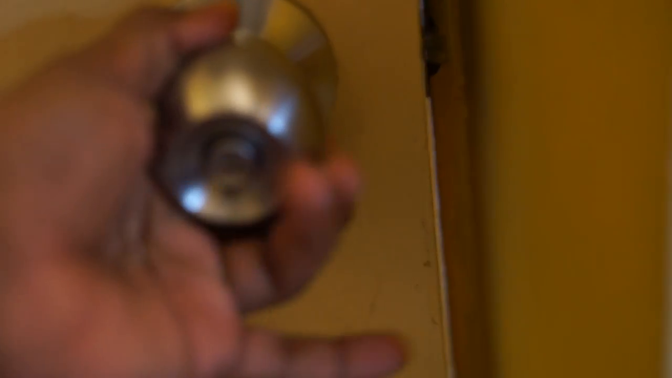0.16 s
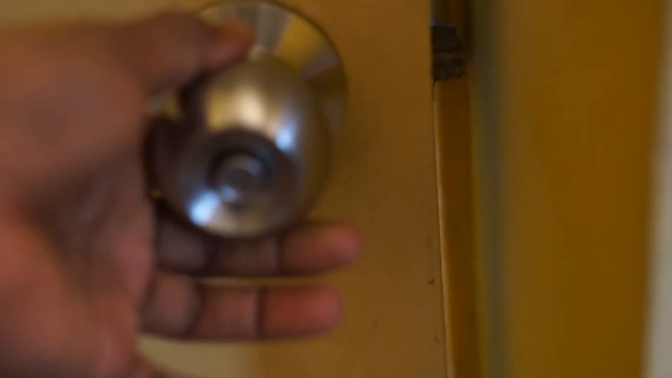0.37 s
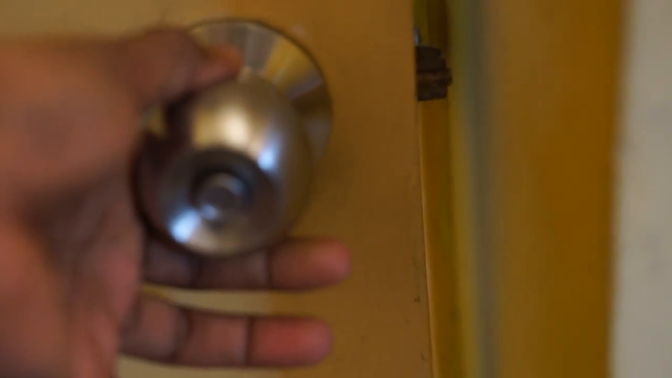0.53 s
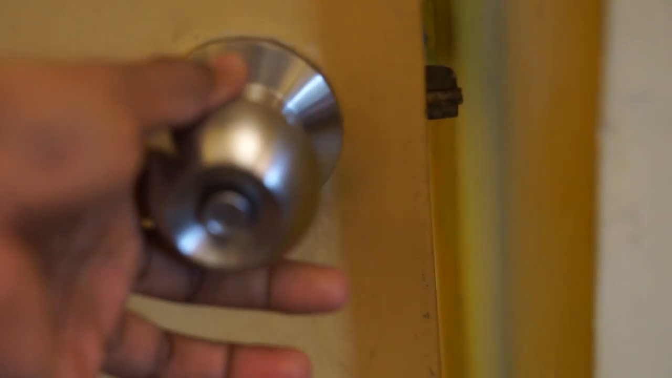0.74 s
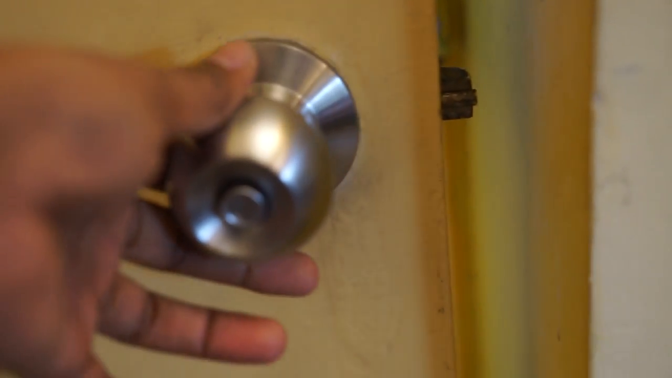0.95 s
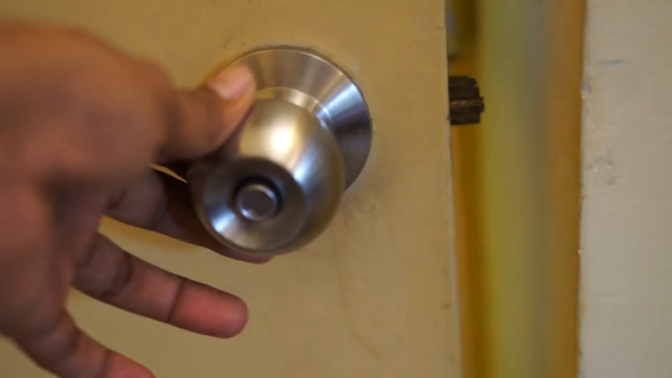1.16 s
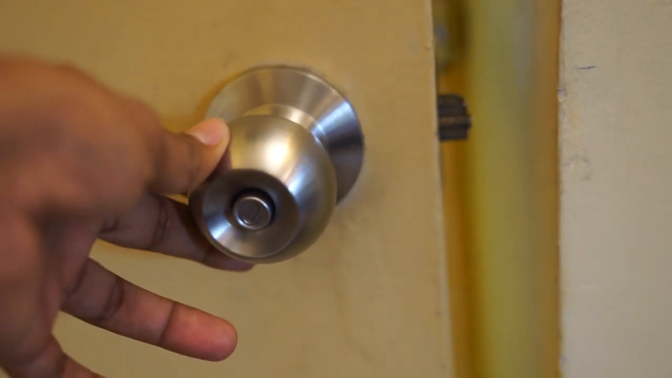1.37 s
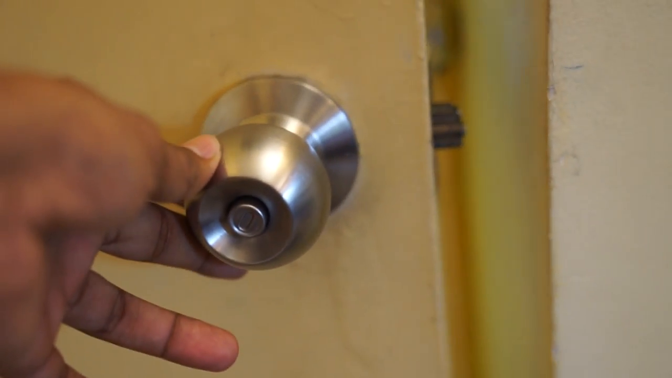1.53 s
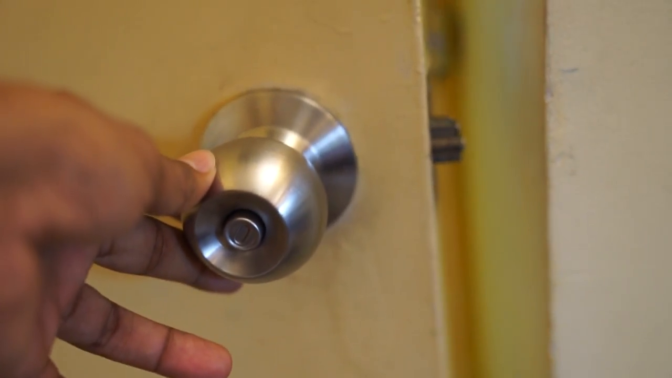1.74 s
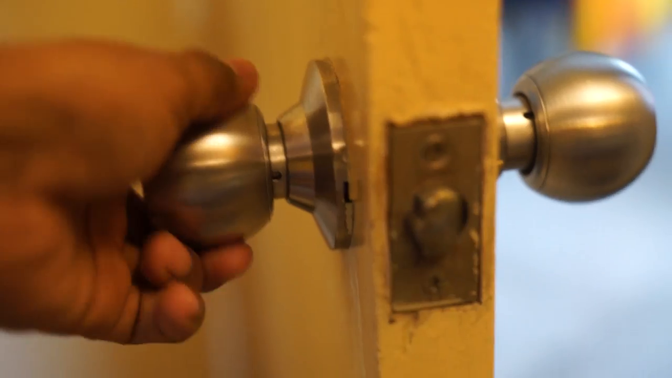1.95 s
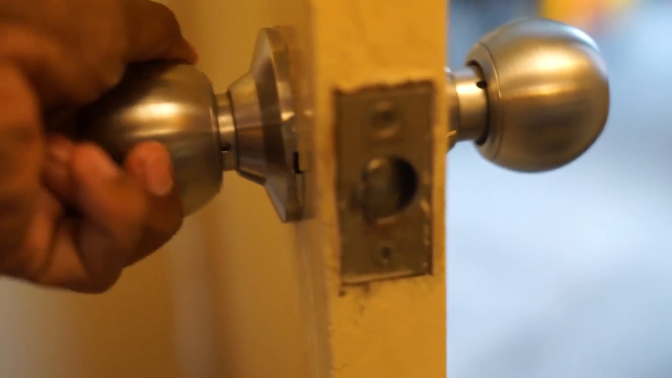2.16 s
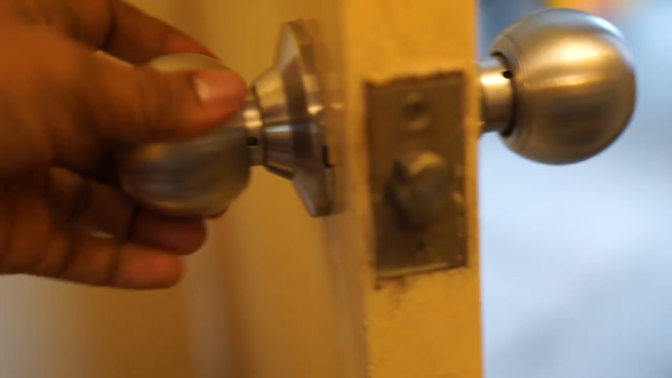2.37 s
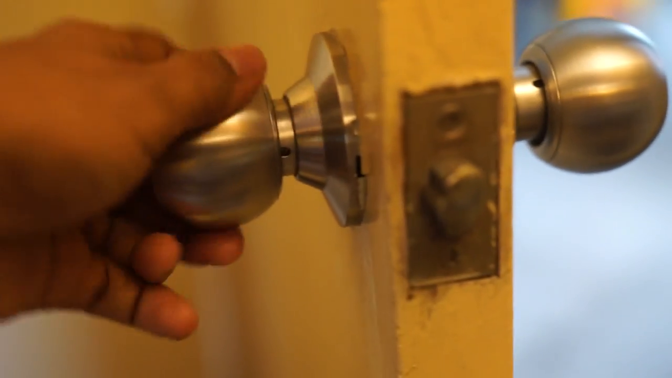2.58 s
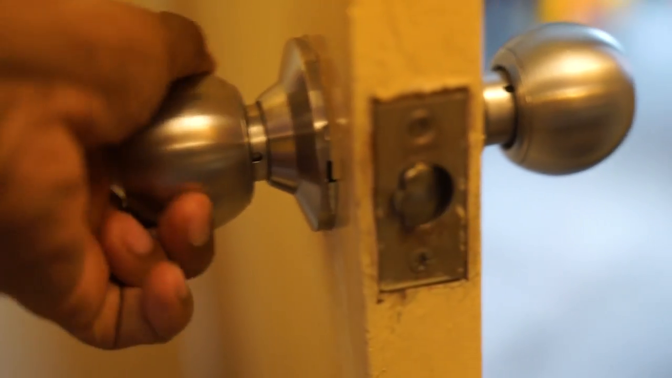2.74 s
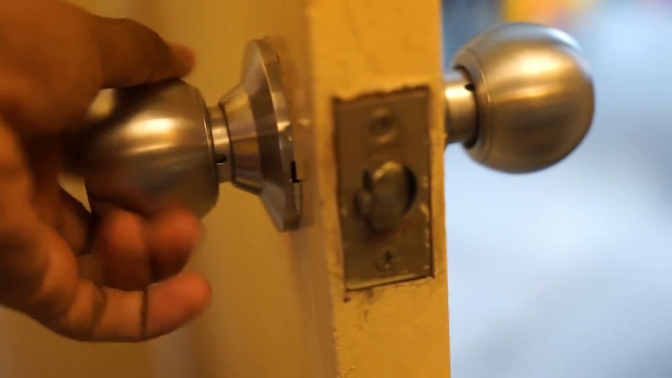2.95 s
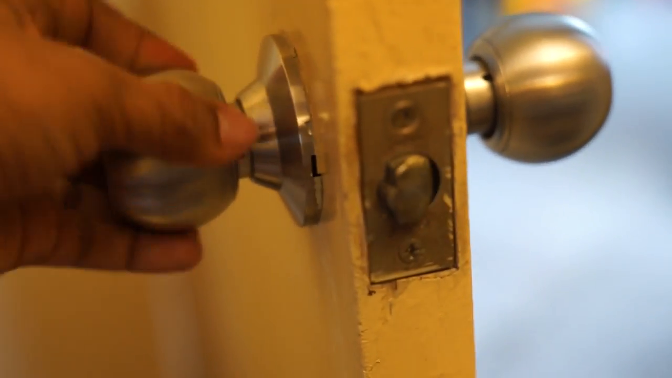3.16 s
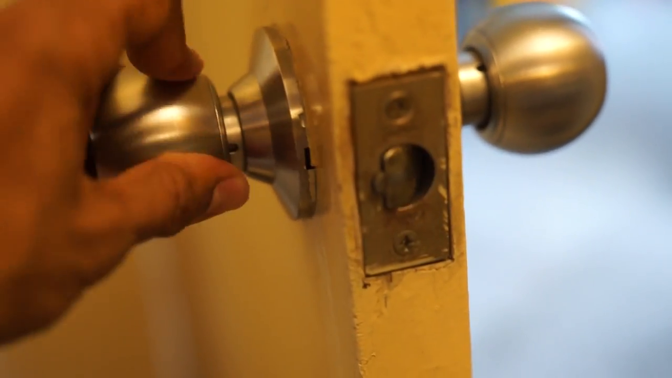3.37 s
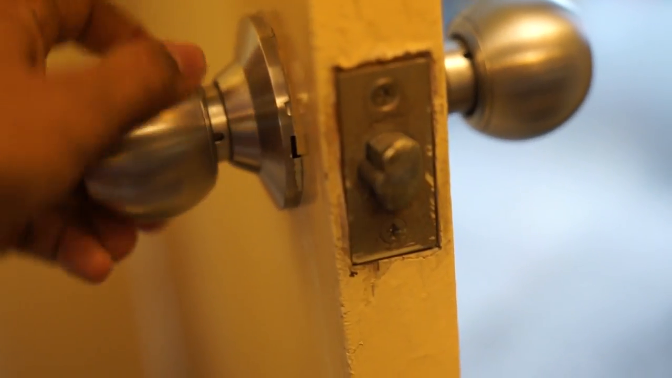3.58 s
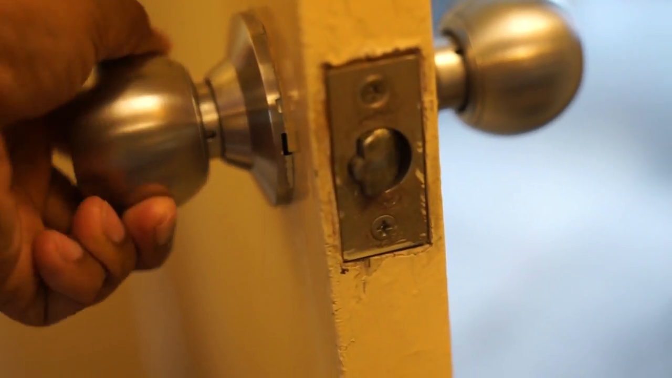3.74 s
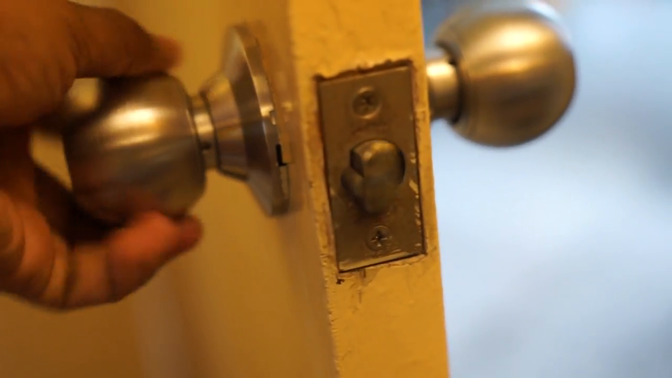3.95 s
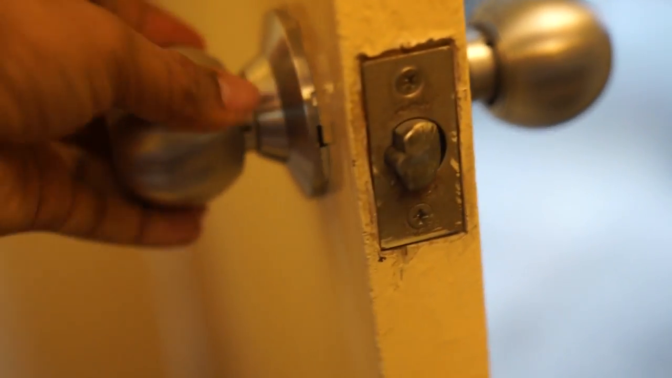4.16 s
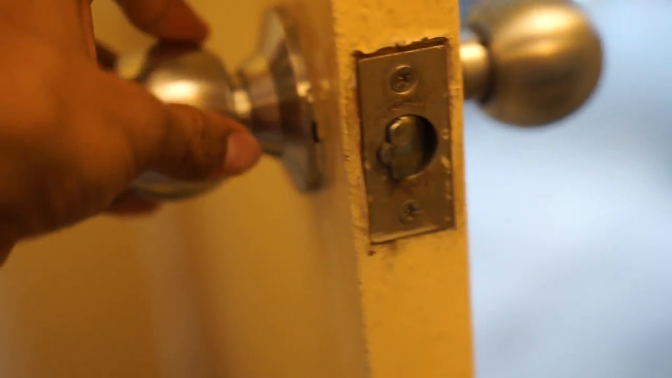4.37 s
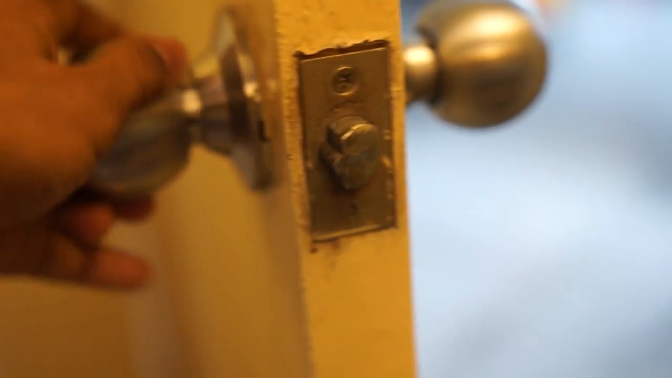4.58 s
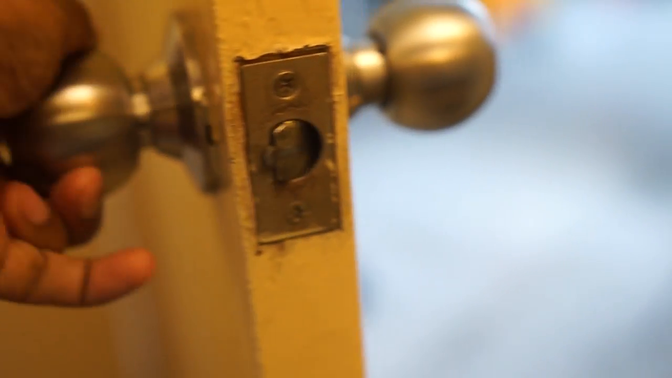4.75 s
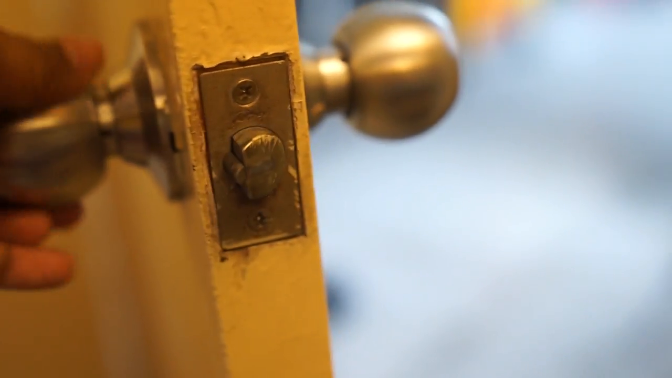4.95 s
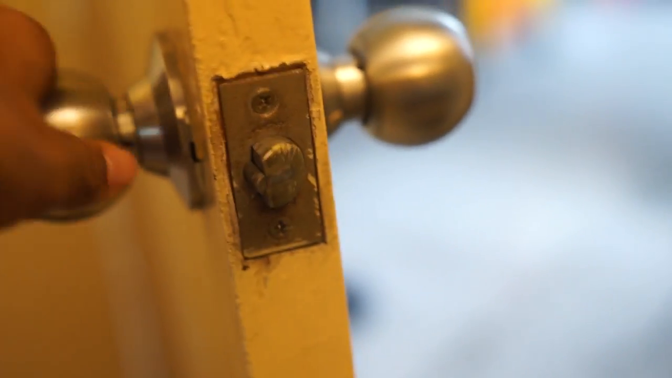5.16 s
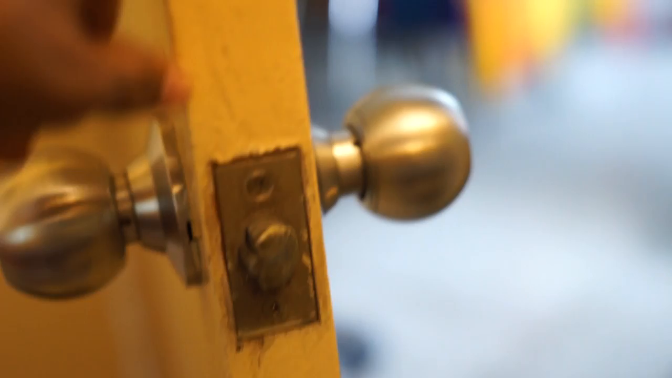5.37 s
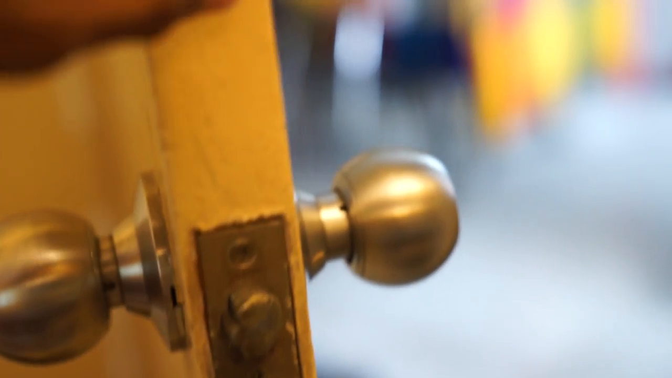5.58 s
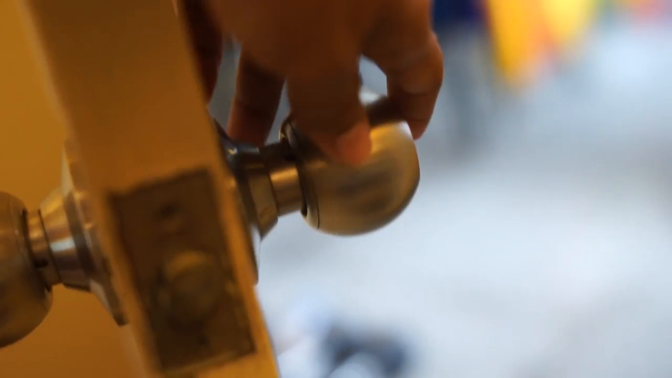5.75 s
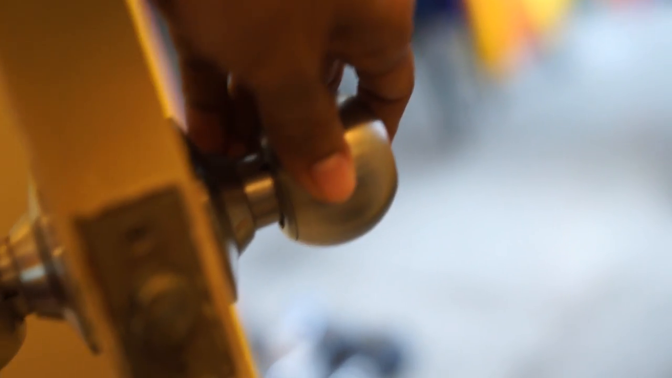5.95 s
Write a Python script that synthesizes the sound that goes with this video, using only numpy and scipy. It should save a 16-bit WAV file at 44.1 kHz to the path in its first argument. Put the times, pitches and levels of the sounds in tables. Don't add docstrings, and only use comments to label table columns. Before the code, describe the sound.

Sharp metallic clacks and rattles of a knob on a wooden door, followed by repeated turns that tick, clunk, grind and squeak.

```python
import sys
import numpy as np
from scipy import signal
from scipy.fft import rfft, irfft
from scipy.io import wavfile

SR = 44100
rng = np.random.default_rng(int(sys.argv[2]) if len(sys.argv) > 2 else 0)


def to_linear_factor(level_db):
    exponent = np.asarray(level_db, float) / 20
    return 10 ** exponent


def output_pcm(signal):
    pcm = np.clip(np.atleast_2d(signal).T, -1, 1) * 32767
    wavfile.write(sys.argv[1], SR, np.round(pcm).astype(np.int16))


N = 265173
EDGE_VIEW_S = 1.87

# t/s, steel level/dB, door wood level/dB, thin parts level/dB, chatter/ms
KNOCKS = [(0.002, -37.5, -46.5, -43.5, 14.6), (0.165, -50.5, -62, -61.5, 3.7),
          (0.1696, -45.5, -37.5, -43, 2.7), (0.189, -59.5, -64.5, -36, 1.3),
          (0.193, -51.5, -37.5, -61.5, 4.7), (0.2251, -24, -35.5, -26, 8.7),
          (0.233, -20, -24.5, -22.5, 3.6), (0.242, -11, -51, -12.5, 7.2), (0.249, -6, -18, -5, 3.6),
          (0.2583, -13, -24.5, -2.5, 2.3), (0.262, -31, -14.5, -24.5, 3), (0.403, -42, -52, -59.5, 2.5),
          (0.5082, -21, -23, -29, 2.7), (0.5297, -26.5, -67, -35, 5.2), (0.5537, -38, -56, -46, 11),
          (0.6283, -34.5, -36.5, -41, 5.1), (0.8119, -58, -47.5, -64.5, 2.8), (0.898, -38, -64, -44, 2),
          (0.91, -31, -54, -35, 3.1)]
# t/s, steel level/dB, door wood level/dB, thin parts level/dB, chatter/ms
STOPS = [(2.3342, -20.5, -31.5, -22.5, 6.4), (2.3489, -12, -20, -10.5, 3.5), (2.353, -20.5, -29, -23, 0.48),
         (2.366, -43, -20, -10.5, 2.4), (2.5874, -20.5, -59, -25, 4.2), (2.63, -31, -28, -17.5, 1.5),
         (2.6418, -45, -26, -27, 2.66), (3.0499, -27, -43, -29.5, 20), (3.0606, -14, -22.5, -12, 7.1),
         (3.067, -12, -14.5, -15.5, 2.56), (3.0742, -17, -17, -9.5, 3.6), (3.611, -20.5, -36, -27, 5.6),
         (3.6348, -25, -38, -9, 1.1), (3.682, -23, -28, -24, 4.1), (4.033, -23.5, -35, -19, 8),
         (4.0504, -16.5, -19.5, -13, 5.2), (4.063, -22, -19.5, -9.5, 5.7), (4.15, -53, -41.5, -40, 0.82),
         (4.6196, -15, -44, -26, 1.4), (4.6556, -40, -20, -12, 1.7), (4.6665, -25, -48, -34.5, 1.7),
         (4.675, -22, -27.5, -20.5, 5.2), (5.004, -19.5, -52, -20, 3.5), (5.029, -40, -24.5, -27, 4.2)]
# t/s, steel level/dB, thin parts level/dB
TAKE_UP = [(2.254, -28.5, -39.5), (2.285, -31.5, -39), (2.295, -32, -37.5), (2.314, -50, -36.5),
           (2.9669, -33.5, -44), (3.0017, -37, -50), (3.0221, -29, -35.5), (3.0287, -36, -31.5),
           (3.0397, -58, -35.5), (3.4873, -43.5, -49), (3.54, -33.5, -36.5), (3.5476, -25.5, -26.5),
           (3.564, -24, -23), (3.5661, -30.5, -35), (3.9886, -40, -42), (4.0002, -32, -38),
           (4.009, -38, -28.5), (4.0232, -43, -30), (4.514, -38.5, -45.5), (4.5277, -38, -42),
           (4.54, -43, -35.5), (4.5542, -28.5, -28.5), (4.5695, -34.5, -40), (4.5842, -35, -45),
           (4.5965, -26.5, -26), (4.92, -32.5, -36.5), (4.9284, -48, -33.5), (4.9594, -56, -27),
           (4.9859, -44, -22)]
# t/s, steel level/dB, thin parts level/dB
SETTLE = [(2.489, -42, -57), (2.5087, -37, -57), (2.619, -38.5, -26.5), (2.6802, -27, -38.5),
          (2.697, -29.5, -36), (2.7164, -38, -45), (2.7398, -35, -50), (2.774, -41, -44), (2.8, -53, -49),
          (2.868, -46, -61), (3.1718, -35, -43), (3.232, -32.5, -37), (3.255, -34.5, -42),
          (3.284, -31.5, -37), (3.3178, -31, -29.5), (3.3315, -30.5, -53.5), (3.622, -32, -34.5),
          (3.6463, -29, -27), (3.698, -30, -35.5), (3.714, -45, -50), (3.739, -42, -57),
          (3.799, -32.5, -39), (4.6473, -24.5, -27), (4.749, -32.5, -42), (4.763, -34.5, -33.5),
          (4.777, -34, -36.5), (4.802, -35, -42.5), (4.8305, -38, -51), (5.0347, -44, -19.5),
          (5.1631, -38.5, -36)]
# t/s, steel level/dB, thin parts level/dB
JIGGLE = [(1.873, -33.5, -42), (1.901, -35.5, -40), (1.926, -38.5, -32), (1.931, -32, -40.5),
          (2.011, -29.5, -28), (2.0384, -31, -42), (2.0561, -54, -28.5), (2.076, -40, -41),
          (2.1075, -36, -35), (4.188, -51.5, -48), (4.211, -36, -42), (4.233, -35, -44.5),
          (4.266, -32.5, -44), (4.287, -34, -42), (4.3234, -33, -38.5), (4.3536, -37.5, -46),
          (4.433, -44, -31), (4.481, -45, -48), (5.876, -44.5, -74), (5.959, -47.5, -48.5)]
# chatter/ms, door wood level beside steel/dB
TICK_KINDS = [(4, -3), (4, -3.5), (3.45, -4.5)]
# f/Hz, width/Hz, level/dB
LOCK = [(1134, 900, -2.5), (2457, 90, -1.5), (3635, 130, -12), (4180, 140, -16.5), (6037, 250, 0.5),
        (6460, 100, -3.5), (9500, 360, -22), (11520, 2200, -9)]
# f/Hz, width/Hz, level/dB
FRONT_MODES = [(1958, 80, -0.5), (5790, 70, 7.5)]
# f/Hz, width/Hz, level/dB
EDGE_MODES = [(2350, 17, 3), (11800, 270, -23), (5700, 42, 2.5)]
# t of most force/s, grind level/dB, rub on the door level/dB, swell/s, fade/s
STROKES = [(0.001, -48, -51.5, .011, 0.18), (0.26, -57.5, -15.5, 0.039, 0.068),
           (.2, -49.5, -38, 0.015, 0.25), (.418, -50.5, -46.5, 0.2, 0.54), (1.886, -44, -60, 0.015, 0.6),
           (2.078, -48, -42, 0.17, 0.13), (2.36, -30.5, -33.5, 0.11, 0.28),
           (2.602, -37.5, -36.5, 0.098, 0.44), (3.078, -31.5, -33, 0.091, 0.41),
           (3.66, -43, -32.5, 0.17, 0.26), (4.051, -29.5, -31.5, 0.064, 0.39),
           (4.58, -55, -37, 0.059, 0.33), (4.696, -35.5, -40.5, 0.17, 0.36),
           (4.91, -56.5, -48, 0.024, 0.11), (5.026, -38, -34.5, 0.2, 0.25), (5.54, -66.5, -76, 0.34, 0.084),
           (5.739, -55, -48.5, 0.79, 0.065), (5.89, -77, -52, 0.02, 0.14), (5.93, -72, -65.5, 0.052, 0.12),
           (5.85, -60.5, -51.5, 0.29, 0.48), (3.574, -35, -44.5, 0.041, 0.3)]
# f/Hz, density level/dB per Hz
GRIND = [(710, -36.5), (1200, 0.5), (2300, 6.5), (2730, 1), (3550, 0.5), (5240, 0.5), (10500, -19),
         (11900, -12), (16000, -38)]
# start t/s, end t/s,
# level/dB, overtone level/dB, after-ring level/dB
SQUEAKS = [
    (3.578, 3.596, -35, 4, -50),
    (3.591, 3.62, -18, -9, -41),
    (3.62, 3.669, -28, -18, -22),
    (4.599, 4.631, -18.5, -2, -33),
    (4.631, 4.675, -24.5, -24, -32),
    (4.981, 5.011, -19.5, -1.5, -49.5),
    (5.01, 5.064, -29.5, -6, -19),
    (0.94, 1.038, -52, -32, -32),
    (1.04, 1.112, -55, -25.5, -9),
]
# multiple of the pitch, level/dB
OVERTONES = [(1, 0.6), (2, -3), (3, -20.5), (4, -22), (5, -11), (6, -18)]
# t of most force/s, length/s, level/dB, second partial level/dB
CATCHES = [(3.698, 0.018, -44, -48), (3.728, 0.016, -43.5, -56), (3.753, 0.0153, -51, -60),
           (3.772, 0.024, -41.5, -54), (3.819, 0.0192, -47.5, -62), (3.845, .008, -52, -64),
           (3.64, .025, -60, -47), (3.885, 0.037, -57, -69), (3.93, .04, -60, -69),
           (4.685, 0.019, -46, -40), (4.81, 0.032, -44, -58), (5.065, 0.0267, -35, -41),
           (5.089, 0.017, -47, -42), (5.119, 0.012, -48, -43.5), (5.141, 0.021, -45, -53.5),
           (5.165, 0.02, -48, -57), (5.197, 0.019, -44, -55), (5.216, .02, -49, -64),
           (5.247, 0.024, -54, -56), (5.276, 0.016, -60, -60), (5.31, 0.021, -63, -66),
           (5.35, 0.036, -65, -69)]
# t/s, f/Hz, level/dB, rise/ms, t60/s
RINGS = [(0.19, 314, -31, 3.7, 0.13), (0.17, 398, -33, 1.6, 0.043), (0.21, 1950, -38, 1, .03),
         (.402, 510, -25, 1.8, 0.028), (2.5, 2440, -40, 14.4, .1), (2.338, 2260, -17, 4.9, 0.074),
         (2.579, 2400, -24, 8.1, 0.084), (2.641, 1545, -23.5, 2.2, 0.042), (2.686, 1650, -23, 2.5, 0.039),
         (3.68, 2700, -33, 1.8, 0.051), (3.68, 3820, -27, 1.9, 0.063), (4.036, 2290, -16.5, 7.7, 0.116),
         (3.029, 6320, -25, 1, 0.025), (3.32, 12400, -47, 2, 0.13), (.198, 12400, -47.5, 3.3, .12),
         (.909, 3000, -32, 0.91, 0.034), (.508, 1940, -33, 1.1, 0.077), (4.19, 11800, -51, 2.1, .03),
         (4.211, 11800, -47, 2, .03), (4.233, 11800, -44, 1.8, .03), (4.268, 11800, -43, 2, .03),
         (4.289, 11800, -45, 2, .03), (4.324, 11800, -45, 2, .03), (4.232, 3550, -32, 2, 0.059),
         (4.289, 3430, -36, 2, 0.057), (4.006, 1700, -31, 4, .08), (4.095, 1200, -25, 3, 0.065),
         (4.9, 596, -33.5, 5.8, 0.11), (4.925, 440, -35.5, 6.3, 0.092), (5.012, 1800, -26, 3, .05),
         (0.16, 2100, -38, 0.9, .03), (.169, 5700, -41.5, 1, .04), (5.843, 560, -42, 2.5, .05),
         (5.878, 1520, -55.5, 2, 0.045), (5.88, 760, -38, 3.6, 0.044), (.627, 650, -37, 1.1, 0.024),
         (0.61, 1640, -39, 1, 0.031), (.811, 560, -50, 1, 0.028), (.811, 903, -48, 1, .03)]
# t/s, f/Hz, level/dB
PINGS = [(2.01, 10990, -43), (2.04, 6800, -27), (2.074, 6940, -33), (2.0734, 2440, -35), (2.108, 2480, -36),
         (2.108, 7500, -44), (2.334, 5200, -24.5), (2.366, 6460, -27.5), (2.588, 3600, -26.5),
         (2.59, 6450, -33), (2.618, 8200, -40), (2.638, 6250, -32), (2.68, 6100, -35), (2.721, 6600, -50),
         (2.739, 6660, -51), (2.758, 8100, -53), (2.774, 8000, -39), (2.775, 5890, -45),
         (2.786, 6700, -45.5), (2.786, 5200, -46), (2.799, 6400, -50), (2.869, 6330, -45),
         (2.868, 8100, -48), (2.966, 7600, -39), (.03, 5500, -48.5), (.144, 2100, -52), (.897, 3100, -43),
         (4.433, 6700, -32), (4.432, 10600, -41), (4.554, 5970, -25), (4.571, 6000, -36),
         (4.677, 3770, -25), (4.528, 5950, -39), (3.976, 6500, -44), (3.61, 3200, -30)]
# start t/s, end t/s, f/Hz, width/Hz
WHIRRS = [(-.12, .18, 5600, 2200), (2.82, 2.97, 4700, 500), (2.7, 2.84, 3400, 350), (2.69, 2.84, 2330, 250),
          (2.59, 2.67, 2400, 200), (2.03, 2.13, 3500, 300), (2.06, 2.14, 2400, 250), (.9, .98, 5000, 300),
          (5.865, 5.97, 680, 500)]
WHIRR_DB = [-51, -60, -62, -54.0, -44, -57, -52, -54, -49.5]
# t/s, level/dB
SLIDES = [
    [(.85, -76.5), (.89, -49.5), (.93, -43.5), (1.0, -51), (1.06, -63.5), (1.12, -71)],
    [(5.56, -71), (5.62, -52.5), (5.65, -44), (5.7, -41.5), (5.748, -41), (5.754, -64)],
]
# f/Hz, density level/dB per Hz
SKIN = [
    [(880, -55), (1500, -28.5), (1900, -10.5), (2140, -18), (5020, -3.5), (16000, -29.5)],
    [(470, -46), (800, -9.5), (1050, -29), (1500, 1.5), (4240, 4), (16000, -28)],
]
# t/s, deep modes level/dB, leaf modes level/dB, panel modes level/dB
THUDS = [(0.15, -75.5, -52, -69), (0.256, -65, -41, -48), (0.292, -44.5, -66, -54), (0.404, -81, -69, -50),
         (2.044, -63.5, -52.5, -46.5), (2.355, -51, -52, -45), (2.6, -45, -56, -74), (3.07, -50, -73, -62),
         (4.048, -41, -45, -64), (4.632, -77, -52.5, -47.5), (5.269, -48, -66, -71), (5.469, -53, -57, -71),
         (5.873, -48, -59, -53.5)]
# f/Hz, level/dB, t60/s
LEAF = [(71.4, -5.5, 0.35), (95.67, -1, 0.31), (158.3, -2, 0.96), (197.4, 0, 0.75), (306.7, -1, 0.2),
        (411.3, 9.5, 0.236)]
# f/Hz, t60/s
ROOM = [(150, 0.12), (400, 0.41), (1000, 0.41), (2800, 0.355), (6000, 0.37), (9000, 0.25), (14000, 0.35)]
# f/Hz, level/dB
WALLS = [(200, -0.5), (1000, -5.5), (5000, -5.5), (7500, -8.5), (12000, -15.5)]
# f/Hz, density level/dB per Hz
AIR = [(12, -24.5), (22, 1.5), (40, -5.5), (75, -5.5), (430, -6.5), (2600, -22), (5800, -25.5),
       (15500, -35)]
# f/Hz, rms level facing the door/dB, rms level at the edge/dB
HUM = [(99, -61, -65), (298, -70, -73)]


def knocks(wood_db, steel_db, thin_db, modes_db):
    s, mid_db, low_db, high_db, chatter_ms = contacts()
    facing = s < EDGE_VIEW_S
    lag = np.arange(1024)
    luck = rng.standard_normal((len(s), len(lag) + len(LOCK)))
    uneven_db = 2.2 * luck[:, len(lag):]
    firm_db = 0.18 * (mid_db + 14.0)
    fall = np.exp(-lag / SR / (np.clip(chatter_ms, .3, 12)[:, None] / 1000))
    chatter = luck[:, :len(lag)] * fall * (1 - np.exp(-lag / 18.2))
    chatter[:, 26:28] += to_linear_factor(-1.5) * np.sign(luck[:, :1]) * [1, -.6]
    at = np.minimum(((s[:, None] - .0006) * SR).astype(int) + lag, N - 1)

    def train(db):
        return np.bincount(at.ravel(), (chatter * to_linear_factor(db)[:, None]).ravel(), N)

    wood, steel, thin = low_db + wood_db, mid_db + steel_db, high_db + thin_db
    late = lag[:900] / SR
    spread = rng.standard_normal(900) * np.exp(-late / 0.01) * (1 - np.exp(-late / 0.0032))
    leaf = signal.fftconvolve(train(wood), spread / np.sqrt(np.sum(spread ** 2)))[:N]
    out = band(band(leaf, 420, 1900), 190, 3800)
    out += band(band(train(steel), 1560, 6280), 1700, 7300)
    out += band(train(thin), 7000, 13700)
    out += band(train(np.where(facing, wood - 1.5, -150)), 990, 2900)
    for k, (hz, width_hz, db) in enumerate(LOCK):
        part = wood if hz < 1500 else steel if hz < 7000 else thin
        hidden_db = -9 * facing * (k in (1, 4, 5))
        struck = train(part + db + modes_db + firm_db + hidden_db + uneven_db[:, k])
        out += resonate(resonate(struck, hz, width_hz), hz, 4 * width_hz)
    soft_db = 0.28 * facing * np.minimum(mid_db + 16.0, 0)
    for heard, modes in ((facing, FRONT_MODES), (~facing, EDGE_MODES)):
        for k, (hz, width_hz, db) in enumerate(modes):
            part = steel if hz < 7000 else thin
            level = part + db + modes_db + firm_db + soft_db + uneven_db[:, -k - 1]
            out += resonate(train(np.where(heard, level, -150)), hz, width_hz)
    return out


def contacts():
    ticks = []
    for rows, (ms, wood_db) in zip((TAKE_UP, SETTLE, JIGGLE), TICK_KINDS):
        ticks += [(s, db, db + wood_db, thin_db, ms) for s, db, thin_db in rows]
    return np.transpose(KNOCKS + STOPS + ticks)


def turning(per_s, uneven_db, modes_db):
    grind_gain, rub_gain = strokes()
    grains = grit(per_s, uneven_db)
    rung = sum(to_linear_factor(db + modes_db) * resonate(grains, hz, width_hz) for hz, width_hz, db in LOCK if hz > 1500)
    grind = colour(grains + rung, GRIND) * to_linear_factor(0.82 * drift(40))
    spindle = rms_one(resonate(resonate(grains, 2370, 130), 2380, 260))
    grind = grind + to_linear_factor(-23.0) * spindle
    rub = rms_one(band(grit(per_s=1500, uneven_db=3.0), 282, 1580)) * to_linear_factor(2.52 * drift(15.4))
    return grind_gain * to_linear_factor(3.0) * grind + rub_gain * to_linear_factor(-1.5) * rub


def strokes():
    t, gain = np.arange(N) / SR, 0
    for s, grind_db, rub_db, swell, fade in STROKES:
        at = s + np.array([-2 * swell, -swell, 0, 0.1 * fade, fade, 2 * fade])
        shape_db = np.interp(t, at, [-90, -25, 0, -8, -29.5, -90])
        gain = gain + to_linear_factor(shape_db) * to_linear_factor(np.array([[grind_db], [rub_db]]))
    return gain


def grit(per_s, uneven_db):
    hits = rng.random(N) < per_s / SR
    return hits * to_linear_factor(uneven_db * np.minimum(rng.exponential(1, N), 5)) * rng.choice([-1, 1], N)


def squeaks(spindle_hz):
    out, wobble = np.zeros(N), drift(60)
    beats = to_linear_factor(3.5 * np.array([drift(18), drift(18)]))
    rough = to_linear_factor(6.5 * drift(250) - 5.5)
    t = np.arange(SR // 2) / SR
    first_faint_s = SQUEAKS[-2][0]
    for n, (start, end, db, over_db, after_db) in enumerate(SQUEAKS):
        length, i = end - start, int(start * SR)
        span = slice(i, i + len(t))
        fresh = abs(start - SQUEAKS[n - 1][1]) > .0065
        facing = start < EDGE_VIEW_S
        hz = 1915 - 1460 * (start - first_faint_s) if facing else spindle_hz
        rise_s = length * (0.25 if facing else 0.18)
        bend = 1 - .35 * t * facing + fresh * 0.026 * np.exp(-t / 0.006)
        bend = bend - .2 * (np.minimum(t, length) - length / 2) * (not facing)
        release = np.clip((length - t) / .011, 0, 1)
        slip = (1 - np.exp(-(t / rise_s) ** 2)) * release
        slip = slip * to_linear_factor(1.5 * facing * wobble[span] - 2.5 * facing)
        after = to_linear_factor(after_db - 60 * t / 0.18) * np.clip((t - length) / 0.0037, 0, 1)
        unsteady = 1 + 0.0061 * wobble[span] * np.maximum(slip, .6)
        phase = 2 * np.pi * np.cumsum(hz * bend * unsteady) / SR
        for order, (_, level) in enumerate(OVERTONES):
            if order < 2:
                shape = slip + after * to_linear_factor(3 * order) * beats[order, span]
            else:
                shape = slip * rough[span]
            gain = to_linear_factor(db + 1.5 + level + over_db * (order > 0))
            out[span] += gain * shape * np.sin((order + 1) * phase)
    return out + catches(spindle_hz, wobble, beats[1])


def catches(spindle_hz, wobble, flutter):
    t, out = np.arange(N) / SR, 0
    phase = 2 * np.pi * np.cumsum(spindle_hz * (1 + .002 + 0.00409 * wobble)) / SR
    for s, length, db, second_db in CATCHES:
        swell = np.sqrt(2) * np.exp(-((t - s) / (length * np.where(t < s, .3, .7))) ** 2)
        octave = to_linear_factor(second_db) * np.sqrt(flutter) * np.sin(2 * phase)
        out = out + swell * (to_linear_factor(db) * np.sin(phase) + octave)
    return out


def rings(ping_rise_ms, ping_t60_s):
    out, t = np.zeros(N), np.arange(SR // 4) / SR
    pings = [(s, hz, db, ping_rise_ms, ping_t60_s) for s, hz, db in PINGS]
    for s, hz, db, rise_ms, t60 in RINGS + pings:
        rise = 1 - np.exp(-(t * 1000 / rise_ms) ** 2)
        add_at(out, s, to_linear_factor(db - 60 * t / t60) * rise * np.sin(2 * np.pi * hz * t))
    return out


def whirrs():
    t, out = np.arange(N) / SR, 0
    noise = rng.standard_normal(N) * to_linear_factor(3.0 * drift(45))
    for (start, end, hz, width_hz), db in zip(WHIRRS, WHIRR_DB):
        swell = np.sin(np.pi * np.clip((t - start) / (end - start), 0, 1))
        hoarse = resonate(resonate(noise, hz, width_hz), hz, 2 * width_hz)
        out = out + to_linear_factor(db) * swell * rms_one(hoarse)
    return out


def fingers():
    t, out = np.arange(N) / SR, 0
    grains = grit(per_s=5900, uneven_db=-1.0) * to_linear_factor(0.49 * drift(47.6))
    for rows, skin in zip(SLIDES, SKIN):
        s, db = np.transpose(rows)
        out = out + to_linear_factor(np.interp(t, s, db, left=-120, right=-120)) * colour(grains, skin)
    return out


def thuds(push_ms):
    out, t = np.zeros(N), np.arange(SR // 2) / SR
    push = 1 - np.exp(-t * 1000 / push_ms)
    for s, deep_db, leaf_db, panel_db in THUDS:
        for hz, level, t60 in LEAF:
            push_db = deep_db if hz < 120 else leaf_db if hz < 240 else panel_db
            db = push_db + level + 0.94 * rng.standard_normal()
            add_at(out, s, to_linear_factor(db - 60 * t / t60) * np.sin(2 * np.pi * hz * t) * push)
    return out


def room(x):
    t, edges = np.arange(SR) / SR, 60 * 2 ** np.arange(0, 8.6, .5)
    white, echoes = rng.standard_normal((2, SR)), 0
    for k, (lo, hi) in enumerate(zip(edges, edges[1:])):
        hz = np.sqrt(lo * hi)
        decay_db = at_hz(WALLS, hz) - 60 * t / at_hz(ROOM, hz)
        echoes = echoes + band(white[k % 2], lo, hi) * to_linear_factor(decay_db)
    build_up = 1 - np.exp(-(t / 0.0015) ** 2)
    return signal.fftconvolve(x, to_linear_factor(-31.5) * echoes * build_up)[:N]


def background():
    t, hum = np.arange(N) / SR, 0
    air = to_linear_factor(-55) * to_linear_factor(.6 * drift(6)) * colour(rng.standard_normal(N), AIR)
    waver, sway = to_linear_factor(1.5 * drift(8)), .6 * drift(3)
    for hz, before_db, after_db in HUM:
        level = to_linear_factor(np.where(t < EDGE_VIEW_S, before_db, after_db))
        hum = hum + level * np.sqrt(2) * np.sin(2 * np.pi * hz * t + sway)
    return air + waver * hum


def add_at(out, s, sound):
    i = int(s * SR)
    out[i:i + len(sound)] += sound[:N - i]


def rms_one(x):
    return x / np.sqrt(np.mean(x ** 2) + 1e-20)


def at_hz(points, hz):
    table_hz, values = np.transpose(points)
    return np.interp(np.log(hz), np.log(table_hz), values)


def band(x, low_hz, high_hz):
    edges = [low_hz, min(high_hz, .45 * SR)]
    return signal.sosfilt(signal.butter(2, edges, "band", fs=SR, output="sos"), x)


def colour(x, spectrum):
    hz = np.maximum(np.fft.rfftfreq(N, 1 / SR), 1)
    return rms_one(irfft(rfft(x) * to_linear_factor(at_hz(spectrum, hz)), N))


def drift(rate_hz):
    r = np.exp(-2 * np.pi * rate_hz / SR)
    return rms_one(signal.lfilter([1], [1, -2 * r, r * r], rng.standard_normal(N + SR))[SR:])


def resonate(x, hz, width_hz):
    r = np.exp(-np.pi * width_hz / SR)
    poles = [1, -2 * r * np.cos(2 * np.pi * hz / SR), r * r]
    return signal.lfilter((1 - r * r) / 2 * np.array([1, 0, -1]), poles, x + 1e-18)


def scene():
    lock = knocks(wood_db=11.0, steel_db=6.5, thin_db=-1.0, modes_db=7.5)
    lock = lock + turning(per_s=1500, uneven_db=0.5, modes_db=-27.0)
    lock = lock + rings(ping_rise_ms=.6, ping_t60_s=.018)
    squeak = squeaks(spindle_hz=2235)
    near = lock + squeak + room(lock + to_linear_factor(-2.5) * squeak) + fingers()
    dull = signal.sosfilt(signal.butter(3, 12300, fs=SR, output="sos"), near)
    return (dull + thuds(push_ms=1.9) + background() + whirrs())[None]


def low_pass(x):
    return signal.sosfilt(signal.butter(12, 15850, fs=SR, output="sos"), x)


def record(dry):
    rounded = .9 * np.tanh(dry / .9)
    return low_pass(rounded)


dry = scene()
out = record(dry)
output_pcm(out)
```